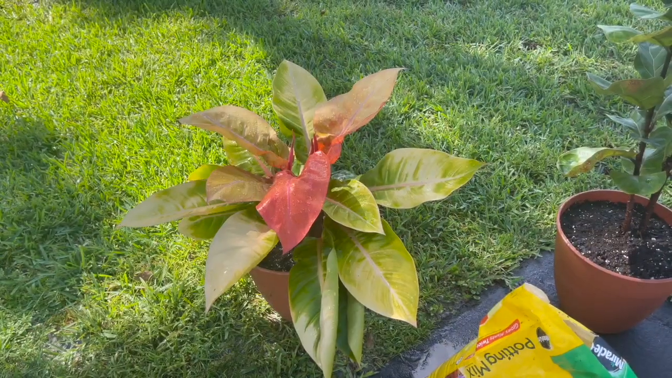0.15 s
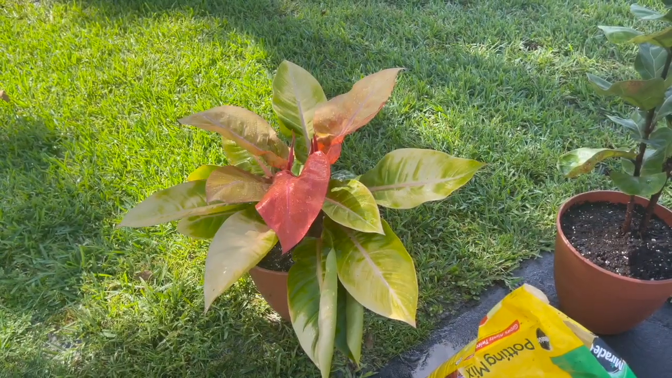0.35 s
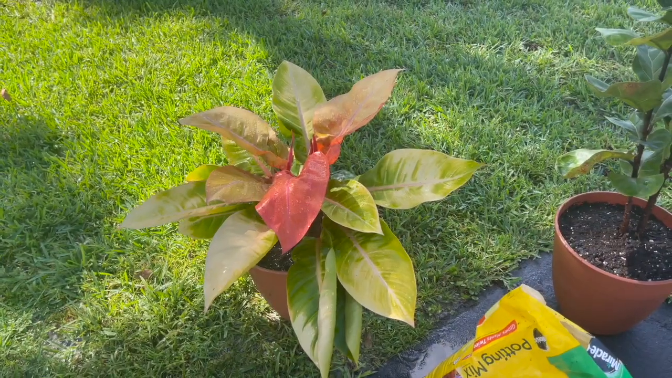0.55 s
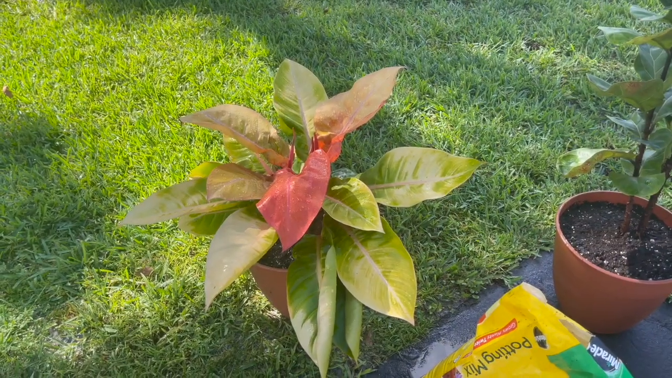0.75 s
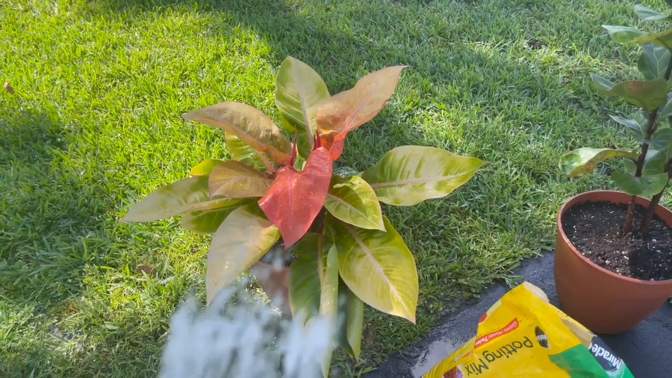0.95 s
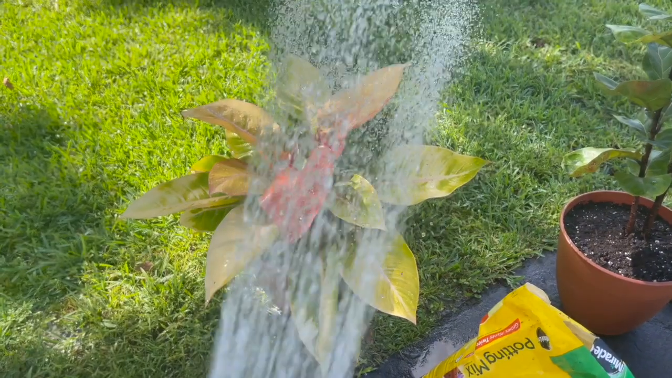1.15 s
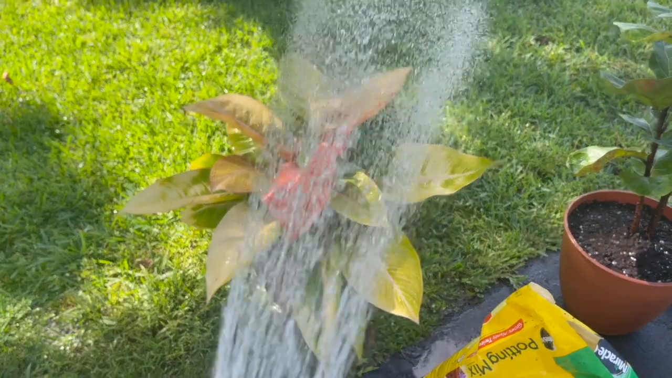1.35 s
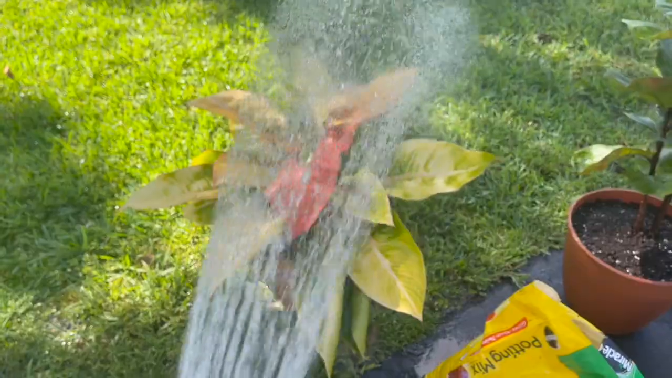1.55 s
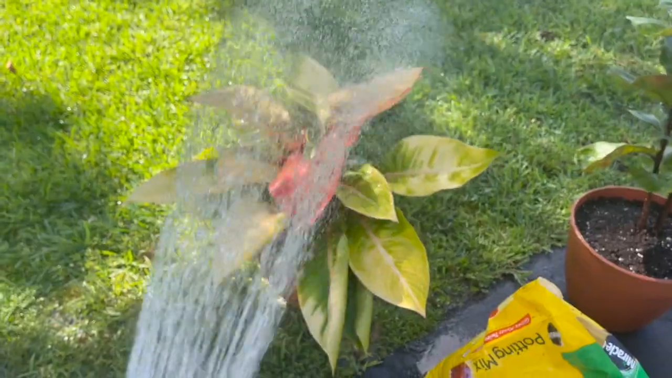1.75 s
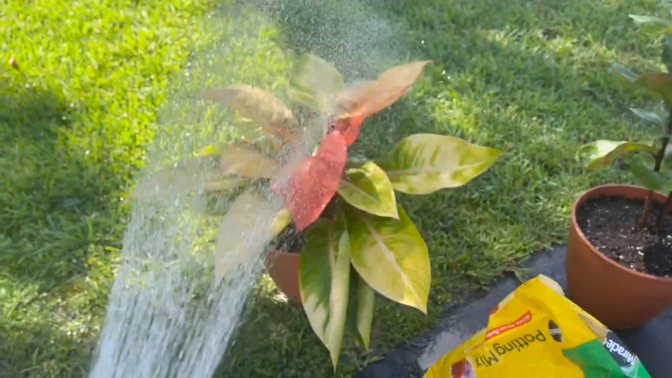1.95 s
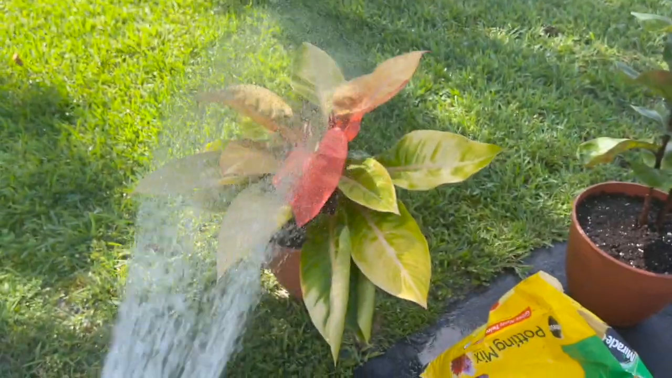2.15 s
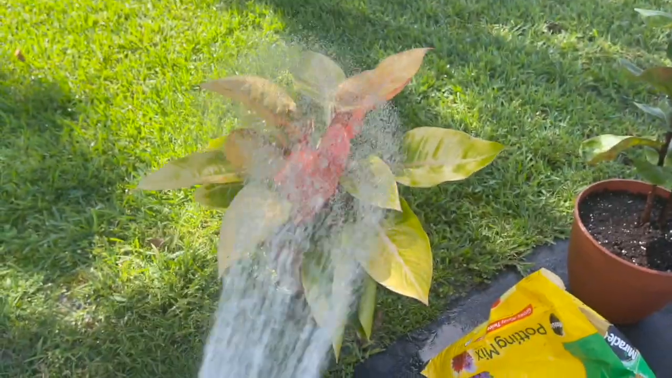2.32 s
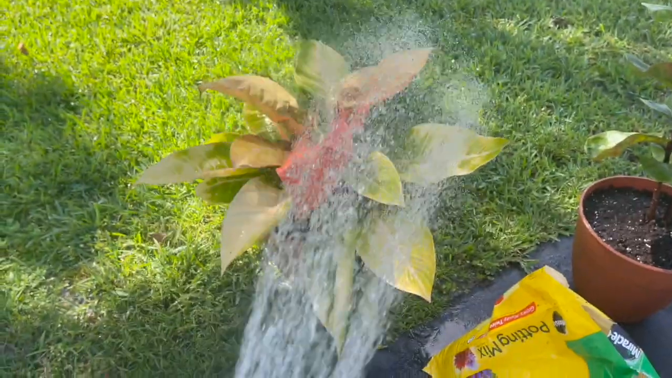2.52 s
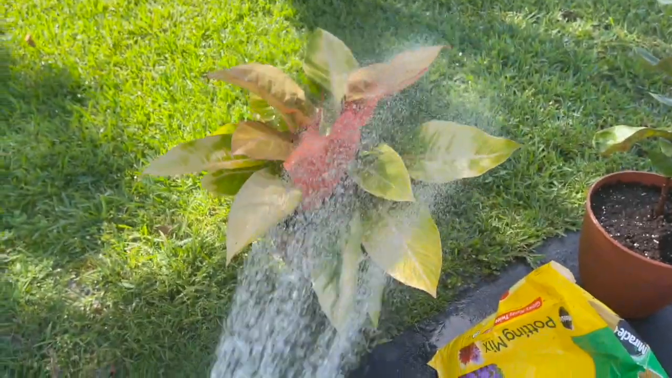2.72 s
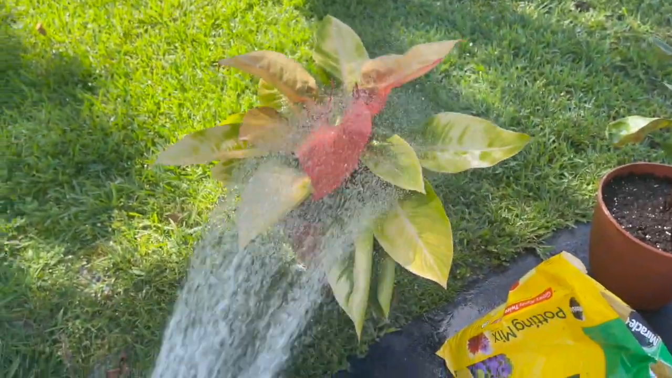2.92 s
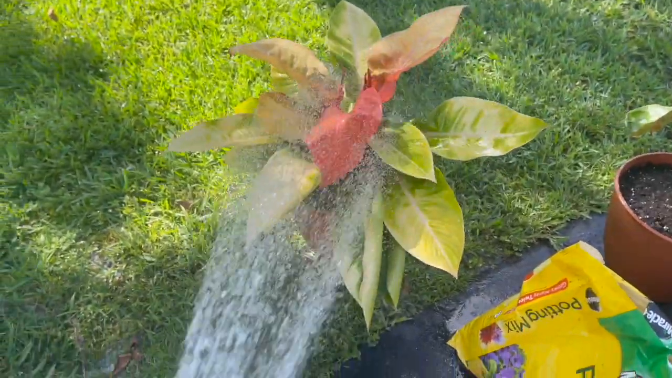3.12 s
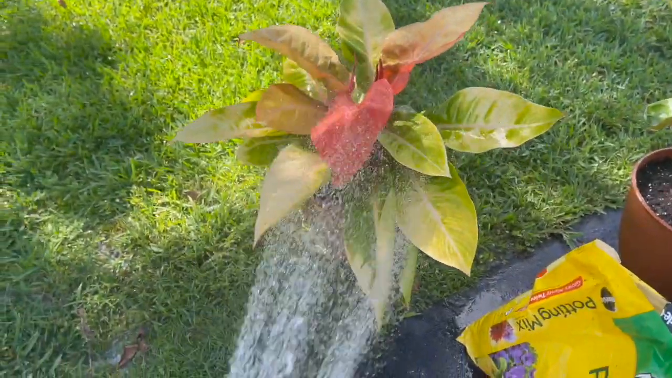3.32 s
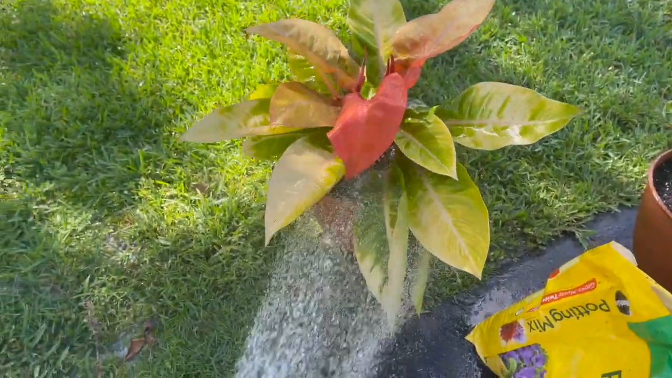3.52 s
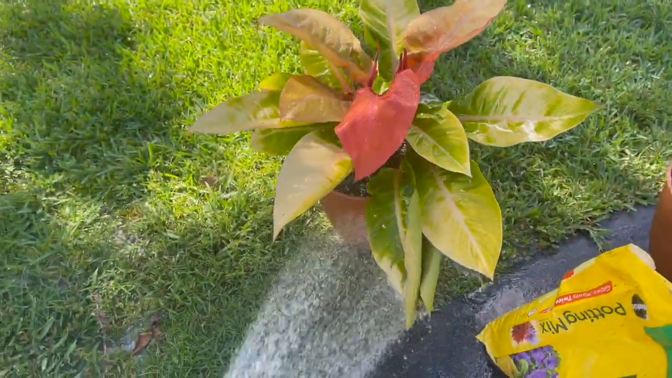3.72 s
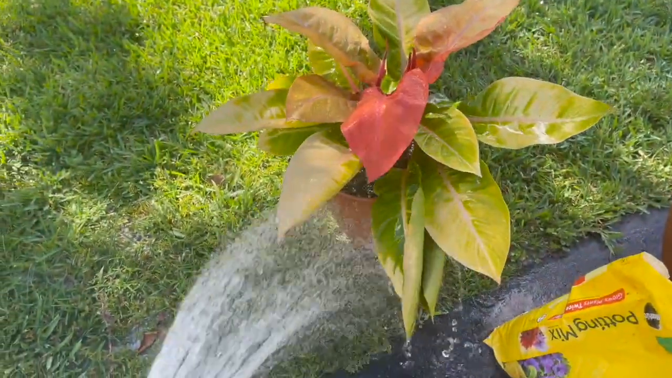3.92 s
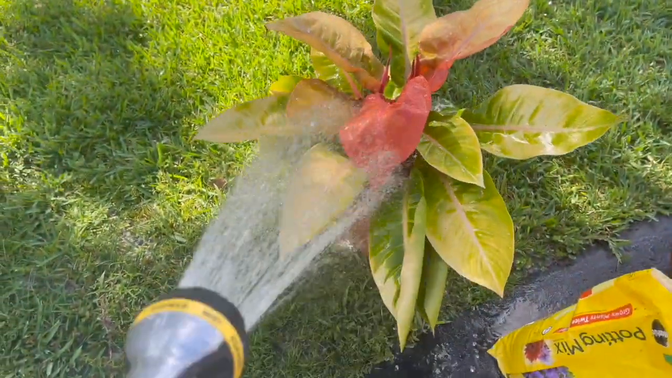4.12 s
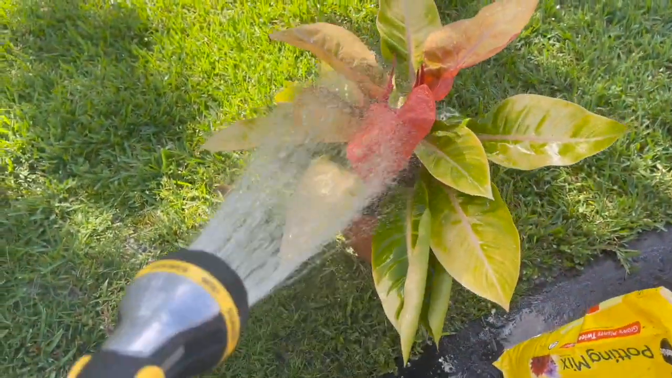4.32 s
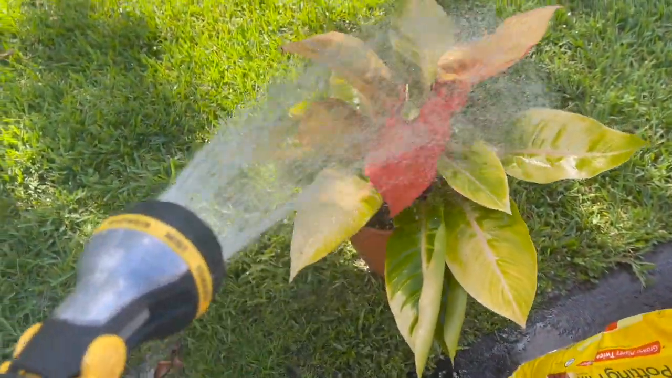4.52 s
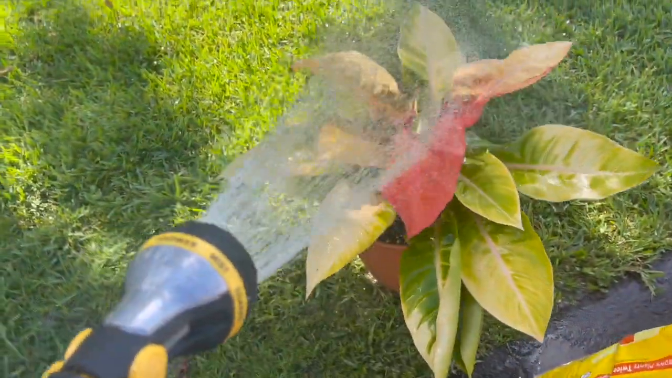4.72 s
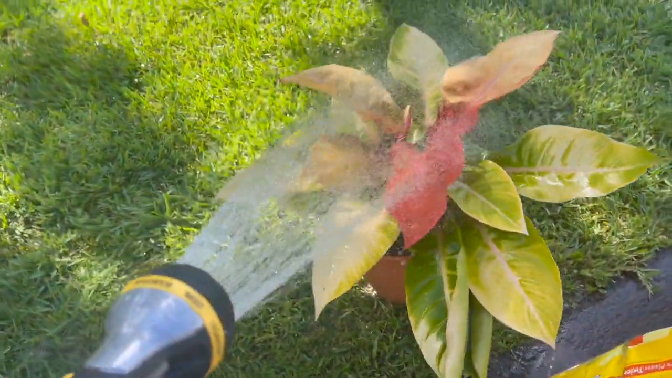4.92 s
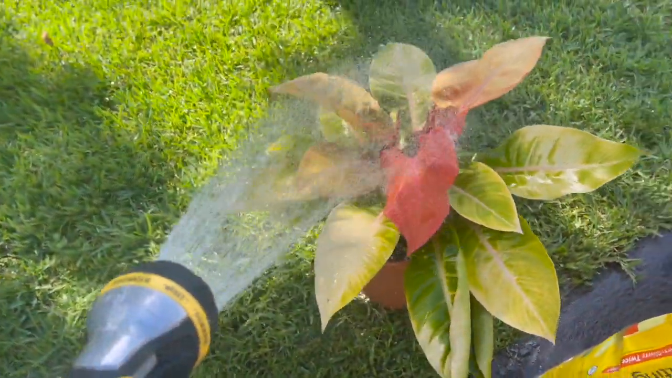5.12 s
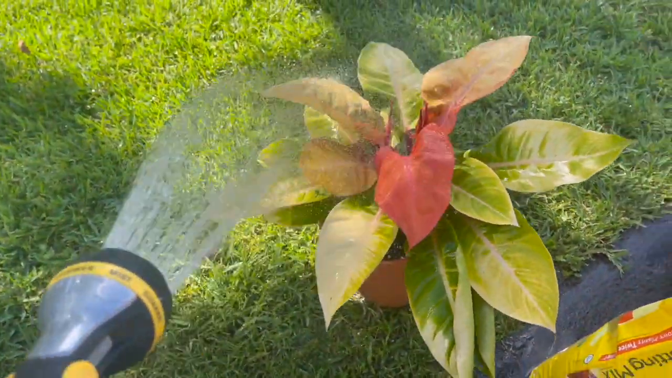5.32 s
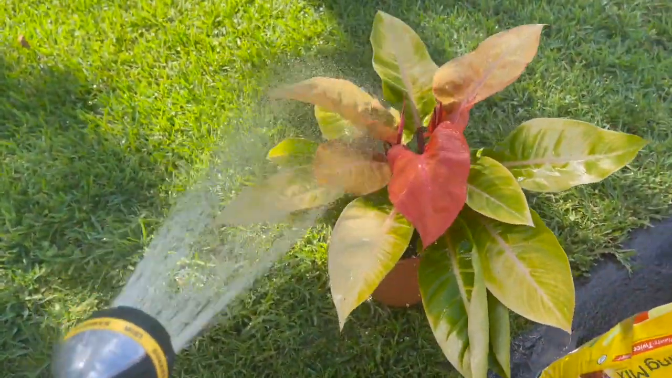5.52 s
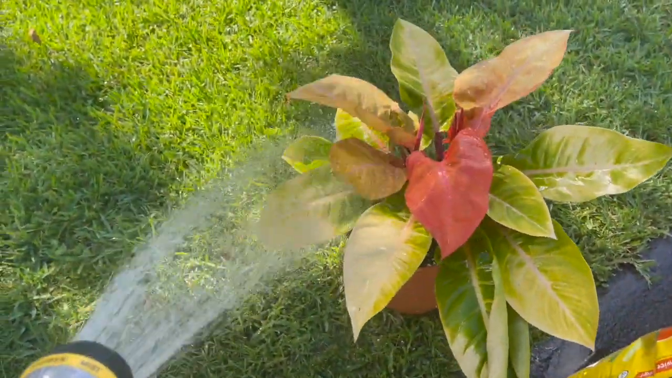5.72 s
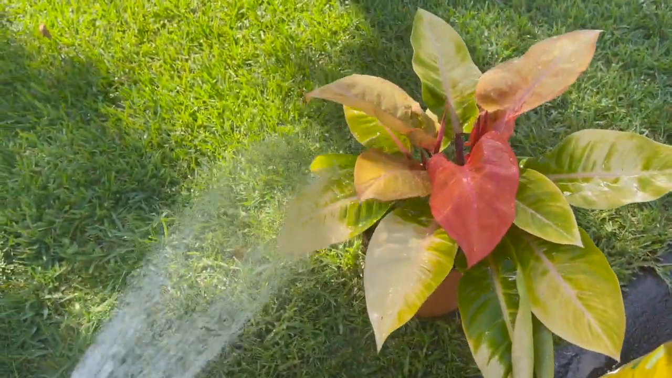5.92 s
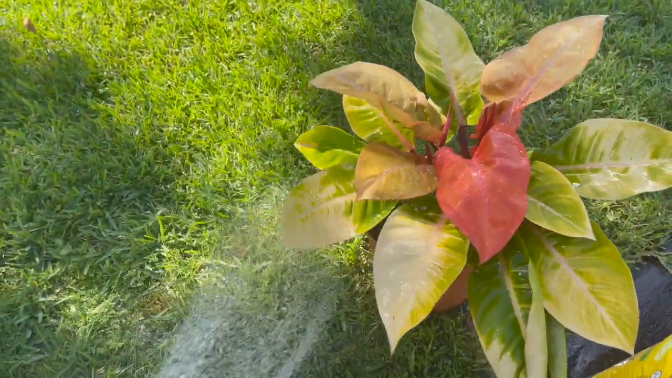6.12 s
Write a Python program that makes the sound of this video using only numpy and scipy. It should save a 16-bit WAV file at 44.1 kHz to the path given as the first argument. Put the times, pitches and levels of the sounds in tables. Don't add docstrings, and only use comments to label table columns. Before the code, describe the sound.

Outdoors, faint low rumble and thin air noise. A hose nozzle near the microphone, on the left, knocks open with a weak spurt, then a harder knock releases full hissing spray. Trapped air makes it sputter and froth. Water patters on potted plant leaves and soil, stray drops snap close by, the hiss grows brighter as the nozzle swings nearer, and a few last sputters follow.

```python
import sys
import numpy as np
from scipy import signal
from scipy.fft import rfft, irfft, next_fast_len
from scipy.io import wavfile
from scipy.ndimage import map_coordinates

SR = 44100
rng = np.random.default_rng(int(sys.argv[2]) if len(sys.argv) > 2 else 0)


def invert_db(x):
    u = np.asarray(x, float) / 20
    return 10 ** u


def persist_wave(psi):
    counts = np.round(np.clip(psi, -1, 1) * 32767).astype(np.int16)
    wavfile.write(sys.argv[1], SR, np.atleast_2d(counts).T)


N = 271656
TIME = np.arange(N) / SR
SIZE = next_fast_len(N + 4096)
HZ = np.maximum(np.arange(SIZE // 2 + 1) * SR / SIZE, 1)
PLANT_LAG = 1.78


def nozzle():
    flutter_db = .4 * drift(12)
    flutter_db = flutter_db + 1.1 * drift(67)
    turbulence = rfft(grains(18000, spread_db=2.7), SIZE)
    steady_db, *tone_lifts_db = facing_db()
    steady_db = steady_db + in_time(FLOW)[0]
    pocket_db = pockets_db()
    hiss = jets(turbulence, steady_db + pocket_db, flutter_db)
    tones = pipe_tones(turbulence, steady_db + 1.35 * pocket_db, tone_lifts_db, flutter_db)
    singing = throats(turbulence, flutter_db)
    return microphone(hiss + tones + singing + hollow(), 9.04, sideways=1.16)


# (time [s], hiss level [dB])
FLOW = [(0.808, -59), (0.86, -39), (1.0, -38), (1.17, -46.5), (1.286, -41.5), (1.3, -33.5), (1.55, -35),
        (2.2, -35), (2.9, -36), (3.45, -37.5), (3.84, -34.5), (4.3, -34), (4.9, -35.5), (5.3, -34.5),
        (5.5, -35.5), (6.16, -37)]
# (frequency [Hz], density [dB per Hz])
JET_SPECTRUM = [(300, -34), (1500, -22), (2300, -21), (4800, -21), (6500, -21), (8000, -18), (9100, -15),
                (10200, -6), (11250, 0), (11650, -6), (12050, -16), (13000, -26), (14000, -39),
                (16000, -47)]
# (frequency [Hz], width [Hz], level [dB])
FROTH_MODES = [(4530, 150, -5), (7100, 160, 4.5), (9100, 11000, -5.5), (9840, 210, 12.5)]


def jets(turbulence, jet_db, flutter_db):
    froth_response = resonances(FROTH_MODES) / (1 + (HZ / 11800) ** 16)
    froth = invert_db(froth_db()) * voiced(turbulence, froth_response, order=1)
    plain = voiced(turbulence, invert_db(on_grid(JET_SPECTRUM)), order=0)
    full_flow_db = -28
    return invert_db(np.minimum(jet_db, full_flow_db) + 3.5 + flutter_db) * (plain + froth)


# (start [s], end [s], share of the hiss [dB])
AERATION = [
    (0.786, 1.814, -4.5),
    (1.798, 2.415, -7.5),
    (2.377, 3.728, -6),
    (5.05, 5.423, -15),
]


def froth_db():
    flushed_db, flush_s = -22, 0.12
    passages = [(db - flushed_db) * span(start, end, flush_s, flush_s) for start, end, db in AERATION]
    return flushed_db + np.max(passages, axis=0)


# (start [s],
# end [s], hiss gain [dB], second tone gain [dB], third tone gain [dB])
FACING = [(0.8, 0.847, -1.3, 17.5, 12), (1.28, 1.482, 2.5, 3, -22), (2.226, 3.103, 4, 2.5, 2.5),
          (3.114, 3.84, 2, 4.5, 10), (3.988, 4.134, 4, 2, 5.5), (4.37, 4.495, 5.5, 5, 4),
          (4.585, 5.1, 5, 5.5, 5.5), (5.099, 5.442, 5.5, 5.5, 3)]


def facing_db():
    swing_in_s, swing_out_s = 0.004, 0.038
    handovers = [row[0] + swing_in_s for row in FACING[1:]] + [N]
    lifts_db = np.zeros((3, N))
    for (start, end, *gains_db), handover in zip(FACING, handovers):
        turned = span(start, end, swing_in_s, swing_out_s) * (TIME < handover)
        lifts_db += np.outer(gains_db, turned)
    return lifts_db


# (time [s], falter [dB], burst [dB], burst length [s])
POCKETS = [(0.921, -2.5, 8.5, 0.053), (1.304, -2, 3, 0.022), (1.827, 3.5, 4, 0.018), (1.947, 4, 2, 0.022),
           (2.025, 4, 7, 0.012), (2.089, -2.5, 6, .02), (2.156, 3, 7, 0.026), (2.212, 5.5, 3.5, 0.029),
           (2.543, 2.5, -0.5, 0.017), (2.782, 3.5, 0.5, .04), (2.953, 3, 2, 0.036), (4.004, 1, 2.5, .015),
           (4.085, -0.5, 3, 0.016), (4.6, 3.5, 2, 0.016), (5.748, 2.5, 10, 0.01), (5.786, 1.5, 6.5, 0.048),
           (5.974, 2, 8.5, 0.014)]


def pockets_db():
    lead_s, falter_s = 0.025, 0.018
    change_db = np.zeros(N)
    for s, falter_db, burst_db, length_s in POCKETS:
        change_db += burst_db * bump(s, 0.32 * length_s, length_s)
        change_db -= falter_db * bump(s - lead_s, falter_s, falter_s)
    return change_db


# (frequency [Hz], width [Hz], level [dB])
PIPE = [(3130, 1410, 2.5), (5920, 910, 0)]
TONES_DB = [-13.5, -17]


def pipe_tones(turbulence, flow_db, lifts_db, flutter_db):
    tones = 0
    for mode, base_db, lift_db in zip(PIPE, TONES_DB, lifts_db):
        level = invert_db(flow_db + base_db + lift_db + 2.5 + 1.06 * flutter_db)
        tones = tones + level * voiced(turbulence, resonances([mode]) ** 3, order=2)
    return tones


# (start [s], end [s], frequency [Hz], width [Hz], level [dB])
THROATS = [
    (4.585, 5.43, 3430, 590, -41.5),
    (5.1, 5.43, 5020, 1200, -42),
    (1.29, 1.5, 8800, 2500, -36.5),
]


def throats(turbulence, flutter_db):
    singing = 0
    for start, end, hz, width, db in THROATS:
        level = invert_db(db + flutter_db) * span(start, end, 0.015, 0.035)
        singing = singing + level * voiced(turbulence, resonances([(hz, width, 0)]) ** 2, order=3)
    return singing


# (time [s], level [dB])
BLOWING = [(0.808, -48), (0.83, -46), (0.84, -41), (1.0, -43), (1.25, -38), (1.288, -53), (1.292, -32),
           (1.55, -33), (1.75, -35.5), (2.8, -33.5), (3.2, -33), (3.8, -37), (4.2, -33), (5.65, -36.5),
           (5.72, -39.5), (6.16, -40)]
# (time [s], peak [dB])
KNOCKS = [
    (0.814, -19),
    (0.837, -22),
    (1.293, -13),
]
# (frequency [Hz], width [Hz], level [dB])
BODY = [(1036, 145, 2.5), (1227, 378, -1.5)]


def hollow():
    blowing = invert_db(in_time(BLOWING)[0] + 19.0 + 1.04 * drift(30)) * grains(7000, spread_db=-0.4)
    for s, db in KNOCKS:
        blowing[:, round(s * SR)] += invert_db(db + 28.0)
    steep_skirts = resonances([(1027, 1050, 0)])
    return shape(blowing, resonances(BODY) * steep_skirts)


# (time [s], patter on leaves [dB], thud on soil against it [dB])
LANDING = [(1.19, -62, -4), (1.26, -44, -1), (1.4, -52.5, -2.5), (1.75, -48, 0.5), (2.0, -47, -2.5),
           (2.6, -39.5, -5.5), (3.15, -38, -5), (3.3, -34.5, -5), (3.43, -36.5, -5.5), (3.62, -33, -17),
           (3.98, -47.5, -3), (4.1, -37.5, -5.5), (4.46, -37.5, -4), (4.7, -42, -5.5), (4.96, -36.5, -4.5),
           (5.43, -45.5, -4), (5.55, -37.5, -6), (6.16, -48.5, -4.5)]
# (frequency [Hz], density [dB per Hz])
SOIL = [(100, -33), (250, 0), (450, -7), (700, 1), (1000, 0), (2000, -13.5)]


def landing():
    leaf_db, share_db = in_time(LANDING)
    ticks = invert_db(leaf_db + 2.5) * leaf_ticks()
    spurt = invert_db(-45.5) * bump(0.916, 0.036, 0.023)
    spurt = spurt + invert_db(-58.5) * span(.808, 1.29, 0.025, .03)
    soil = rms_one(shape(grains(2500, spread_db=-0.2), invert_db(on_grid(SOIL))))
    thuds = invert_db(4.5) * (invert_db(leaf_db + share_db) + spurt) * soil
    heard = microphone(ticks + thuds, PLANT_LAG, sideways=0.045)
    pan_db = np.where(TIME < LANDING[0][0], 9, -2.2)
    return heard * invert_db(np.clip(pan_db, -9, 9) * np.array([[.5], [-.5]]))


# (frequency [Hz], density [dB per Hz])
LEAVES = [(500, -22), (1000, -6), (1600, -1), (2200, 0), (3200, -3), (5000, -8), (8000, -12), (12000, -24),
          (14000, -50)]


def leaf_ticks():
    fine_db = -3 + 2.5 * span(3.33, 4.02, 0.092, 0.075)
    drops = grains(5000, spread_db=-1.0)
    dealt = rng.integers(0, 6, N)
    rings = 0
    for k, hz in enumerate(np.geomspace(900, 9000, 6)):
        level = invert_db(1.4 * drift(13.0) + fine_db * np.log2(hz / 2000))
        struck = rfft(drops * (dealt == k) * level, SIZE)
        rings = rings + struck * resonances([(hz, hz / 1.5, 0)]) / np.sqrt(hz)
    return rms_one(irfft(rings * invert_db(on_grid(LEAVES)), SIZE)[:, :N])


# (time [s], peak [dB])
SPATTER = [(1.884, -20), (1.9265, -5), (2.0182, -18), (2.091, -19), (2.1474, -18), (3.8994, -25),
           (3.9782, -2), (4.083, -17), (4.1423, -11), (4.3628, -14), (4.5798, -3), (4.6302, -17),
           (4.7559, -21), (5.3072, -17), (5.7427, -17), (5.7771, -18)]


def spatter():
    snaps = np.zeros((2, N))
    for s, db in SPATTER:
        snaps[:, round(s * SR)] = invert_db(db - 6)
    return microphone(shape(snaps, resonances([(9000, 12000, 0)])), PLANT_LAG, sideways=.6)


# (frequency [Hz], density [dB per Hz])
AIR = [(32, -19), (55, -3), (95, -2), (140, -8.5), (240, -13), (420, -29.5), (700, -32.5), (870, -26.5),
       (1100, -37), (2000, -37.5), (4500, -42), (7100, -38), (10800, -30), (12800, -44), (14000, -36.5)]
# (time [s], gain [dB])
SWELLS = [(0.14, 5), (1.37, 4), (2.17, 4.5), (3.0, 6), (4.0, 5.5), (4.25, 4.5), (4.45, 3), (5.03, 6.5),
          (5.8, 5), (6.02, 6)]


def outdoors():
    swell_db = -47 + sum(db * bump(s, 0.058, 0.058) for s, db in SWELLS)
    noise = rms_one(shape(rng.standard_normal((2, N)), invert_db(on_grid(AIR))))
    low = shape(noise, 1 / (1 + (HZ / 260) ** 4))
    rumble = invert_db(swell_db - 2.0) * rms_one(low)
    hum = invert_db(-55.5 + 0.87 * drift(1.5)) * np.sin(2 * np.pi * 56.8 * TIME)
    return microphone(invert_db(-40.5) * (noise - low) + rumble + hum, -3.5, sideways=0.5)


# (frequency [Hz], left-right for a source on the left [dB], likeness of the channels [0-1])
PORTS = [(60, -1.5, .9), (450, -2.5, .75), (1050, 8, .9), (1500, 3, .85), (2000, 0, .985), (2700, 0, .985),
         (3500, 4, .75), (5500, 10, .6), (7000, 6, .55), (8000, 4, .7), (9000, .5, .9), (9800, 0, .997),
         (10500, 0, .997), (11400, .3, .94), (12500, -2, .6)]


def microphone(pair, lag, sideways):
    late = map_coordinates(pair[0], [np.arange(N) - lag], order=3)
    direct, scattered, late = rfft([*pair, late], SIZE)
    upper = np.clip((HZ - 7000) / 57.0 + .5, 0, 1)
    lead = 2 * np.pi * HZ / SR * 13.0 + np.pi
    pulled = lead - .3 * np.sin(2 * lead)
    shifted = np.sqrt(1 - upper) * late + np.sqrt(upper) * np.exp(1j * pulled) * direct
    alike = np.clip(on_grid(PORTS, axis=2), 0, 1)
    tilt = invert_db(sideways * on_grid(PORTS) / 2)
    right = alike * shifted + np.sqrt(1 - alike ** 2) * scattered
    return irfft(np.array([direct * tilt, right / tilt]), SIZE)[:, :N]


def grains(per_s, spread_db):
    sizes = invert_db(spread_db * np.minimum(rng.exponential(1, (2, N)), 4))
    sizes = sizes * rng.standard_normal((2, N))
    return rms_one(sizes * (rng.random((2, N)) < per_s / SR))


def drift(rate):
    r = np.exp(-80 * np.pi * rate / SR)
    slow = signal.lfilter([1], [1, -2 * r, r * r], rng.standard_normal(N // 40 + 2002))[2000:]
    return np.interp(np.arange(N) / 40, np.arange(len(slow)), rms_one(slow))


def voiced(turbulence, response, order):
    return np.roll(rms_one(irfft(turbulence * response, SIZE)[:, :N]), 9001 * order, axis=1)


def resonances(modes):
    return sum((-1) ** k * invert_db(db) / (1 + 1j * (HZ - hz ** 2 / HZ) / width)
               for k, (hz, width, db) in enumerate(modes))


def shape(x, response):
    return irfft(rfft(x, SIZE) * response, SIZE)[..., :N]


def on_grid(points, axis=1):
    points = np.array(points)
    return np.interp(np.log(HZ), np.log(points[:, 0]), points[:, axis])


def in_time(rows):
    s, *columns = np.transpose(rows)
    return [np.interp(TIME, s, column, left=-120) for column in columns]


def span(start, end, rise, fall):
    return np.clip(np.minimum((TIME - start) / rise, 1 - (TIME - end) / fall), 0, 1)


def bump(s, rise, fall):
    return np.exp(-((TIME - s) / np.where(TIME < s, rise, fall)) ** 2)


def rms_one(x):
    return x / np.sqrt(np.mean(x ** 2) + 1e-20)


def scene():
    return nozzle() + landing() + spatter() + outdoors()


def band_limit(x):
    return signal.sosfilt(signal.butter(12, 16010, fs=SR, output="sos"), x)


def record(dry):
    rounded = .45 * np.tanh(dry / .45)
    mix = shape(rounded, HZ < 15750)
    return band_limit(mix)


dry = scene()
out = record(dry)
persist_wave(out)
```